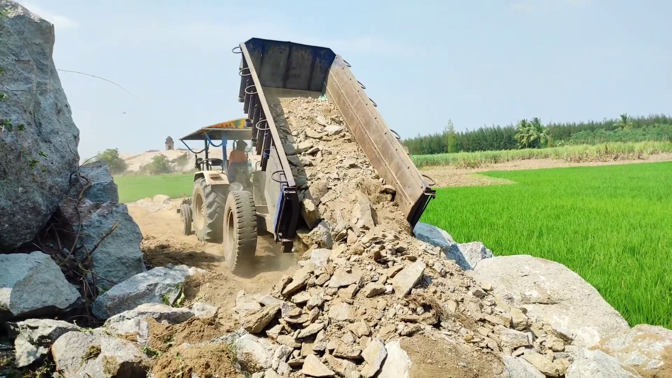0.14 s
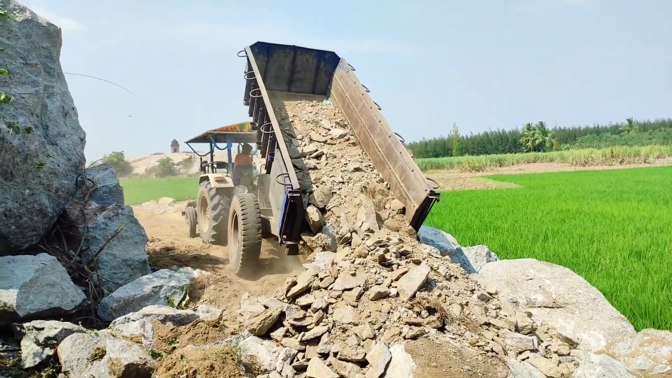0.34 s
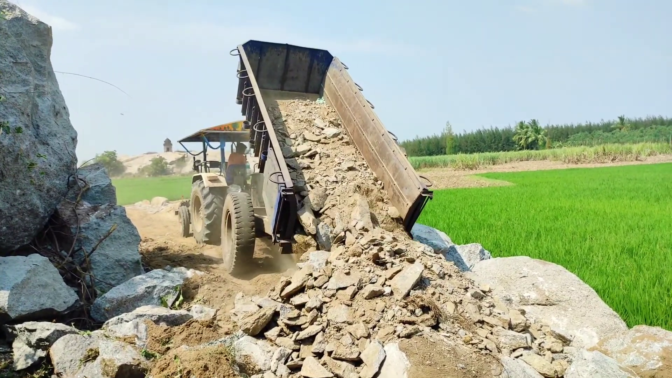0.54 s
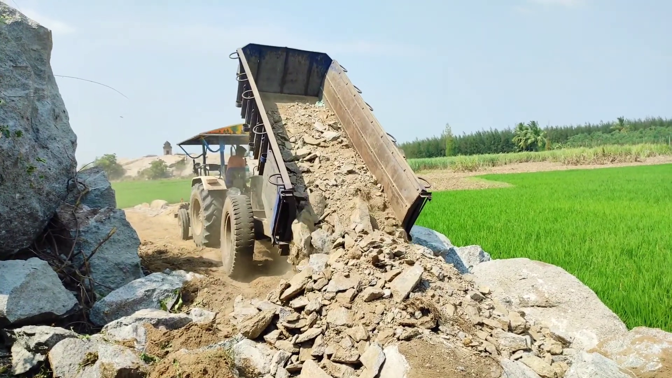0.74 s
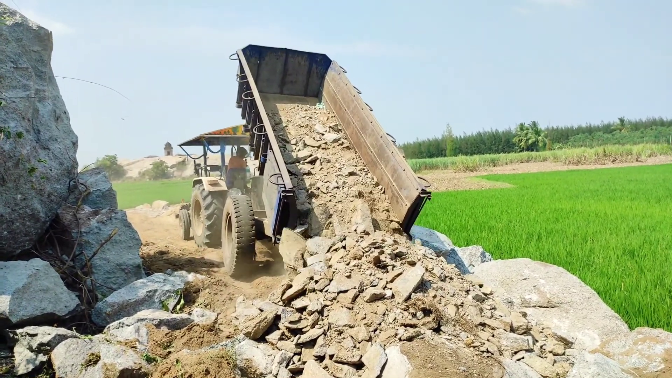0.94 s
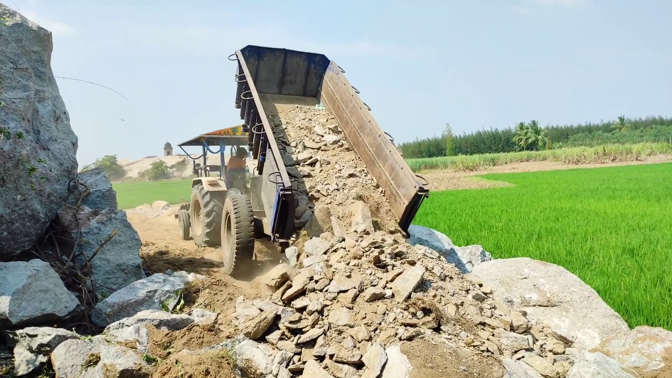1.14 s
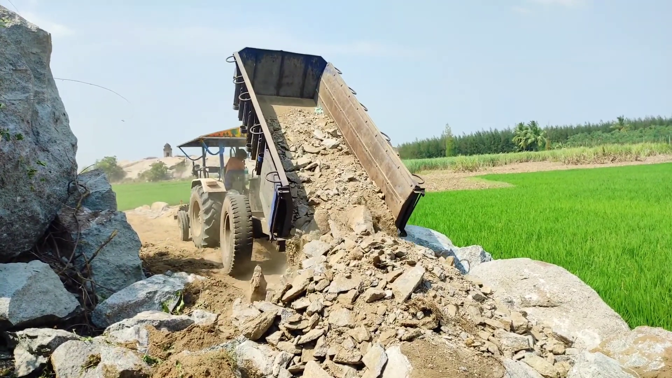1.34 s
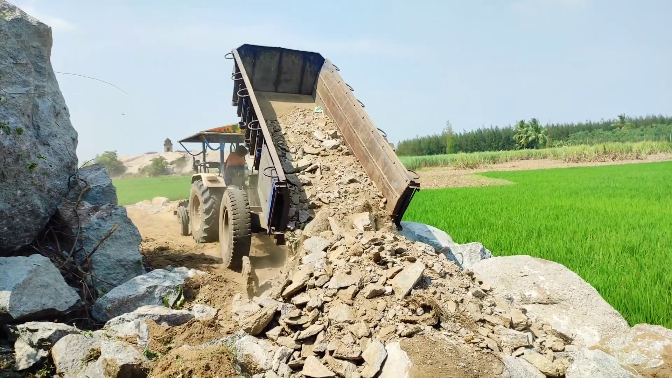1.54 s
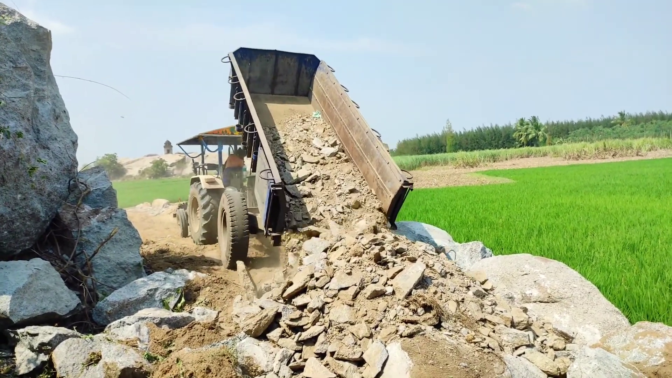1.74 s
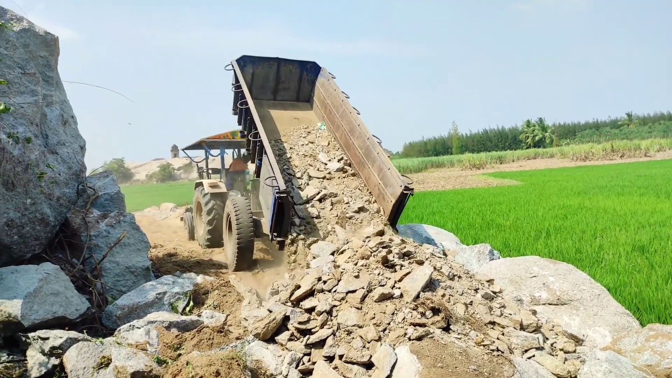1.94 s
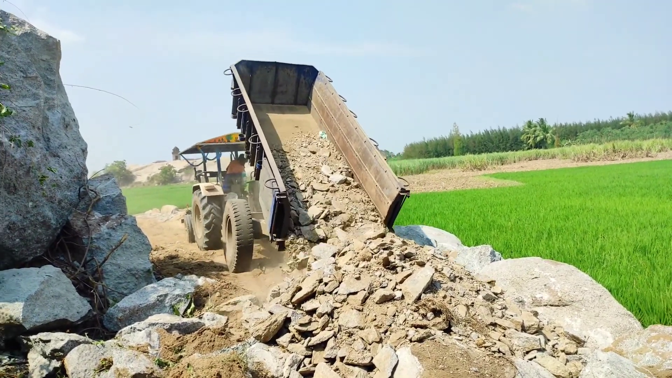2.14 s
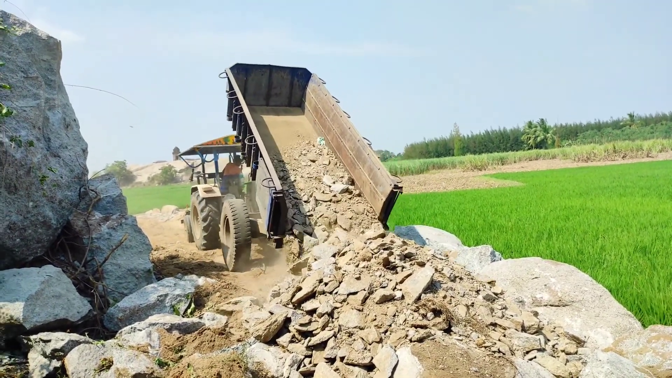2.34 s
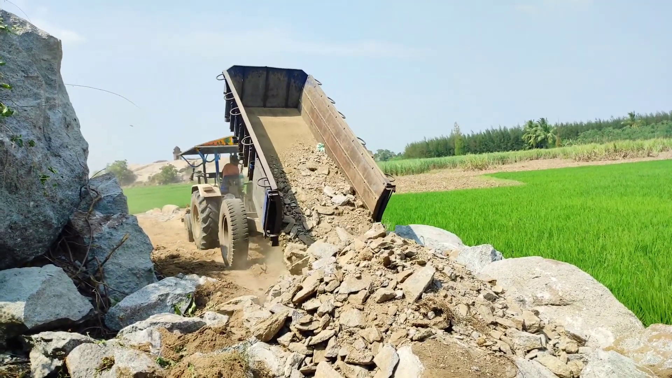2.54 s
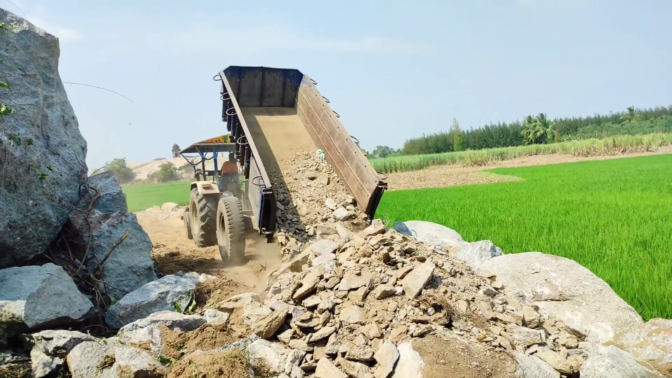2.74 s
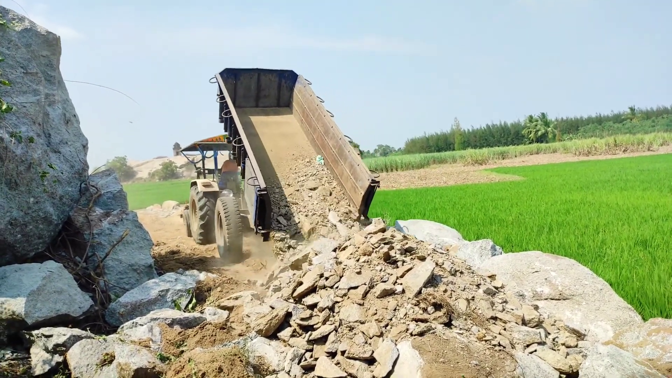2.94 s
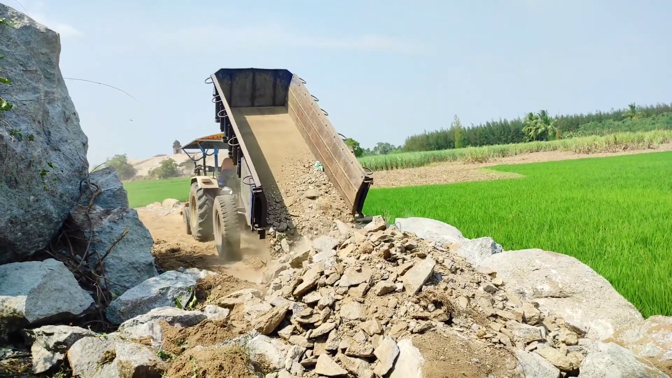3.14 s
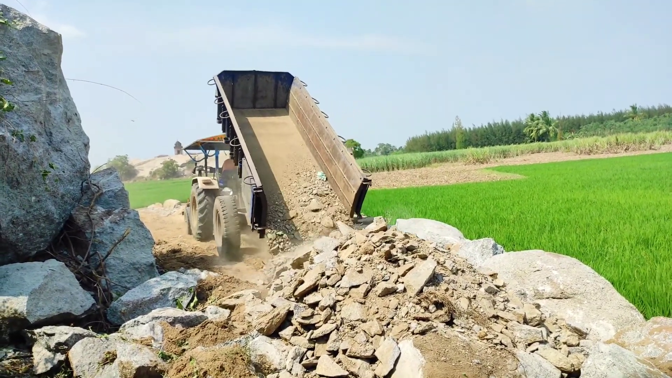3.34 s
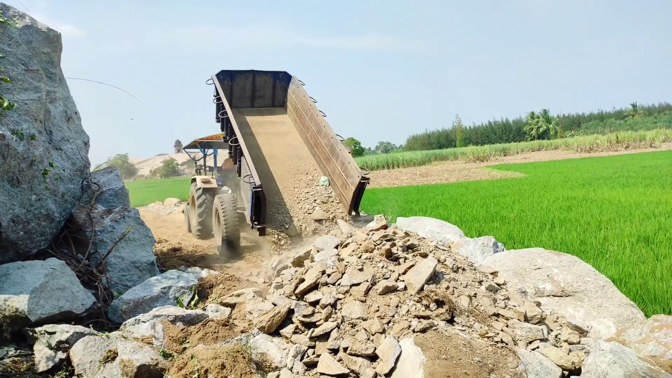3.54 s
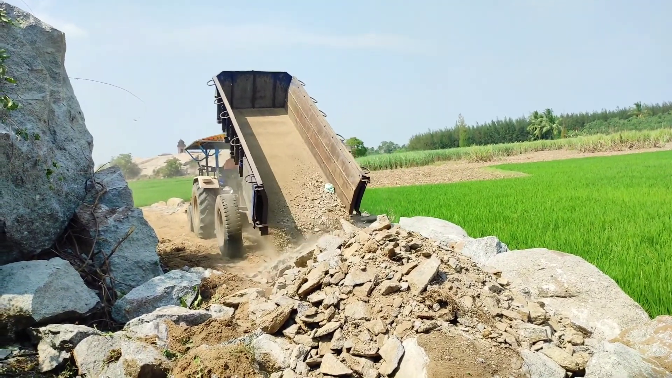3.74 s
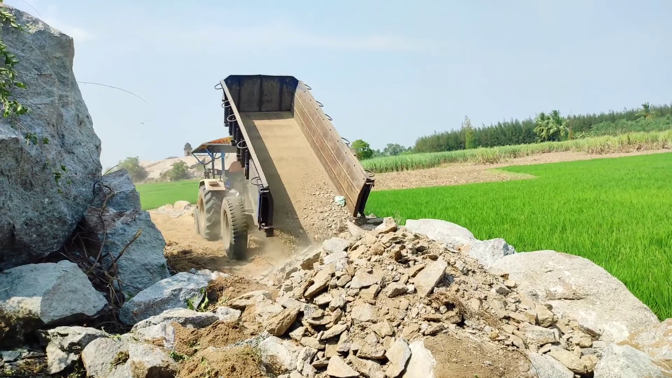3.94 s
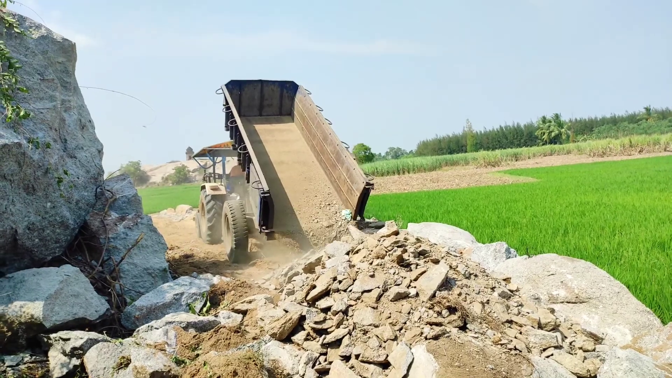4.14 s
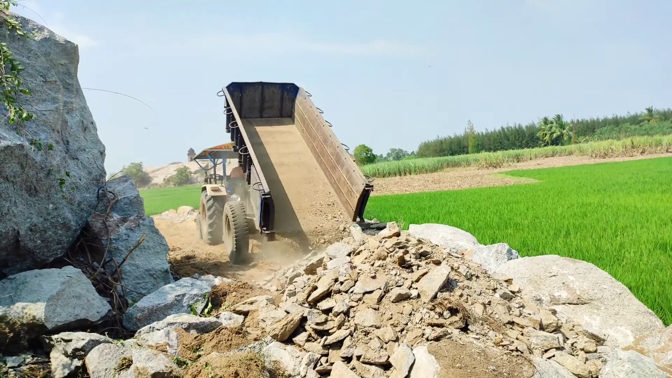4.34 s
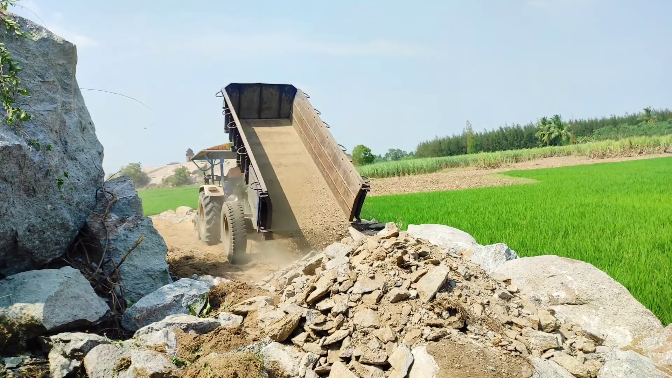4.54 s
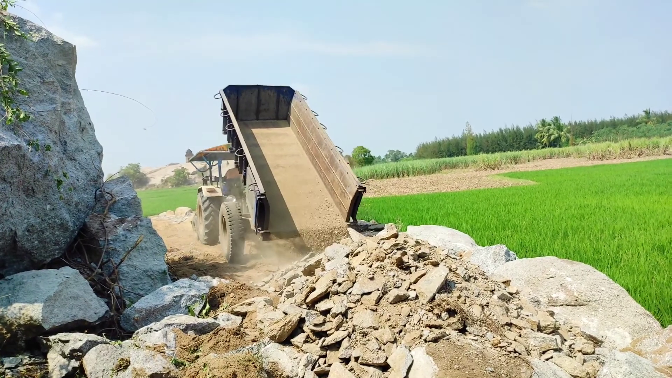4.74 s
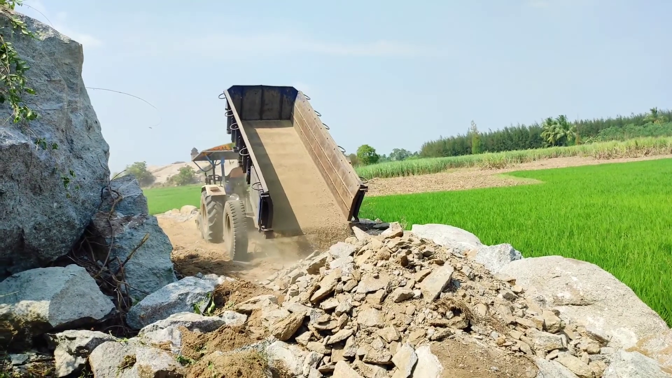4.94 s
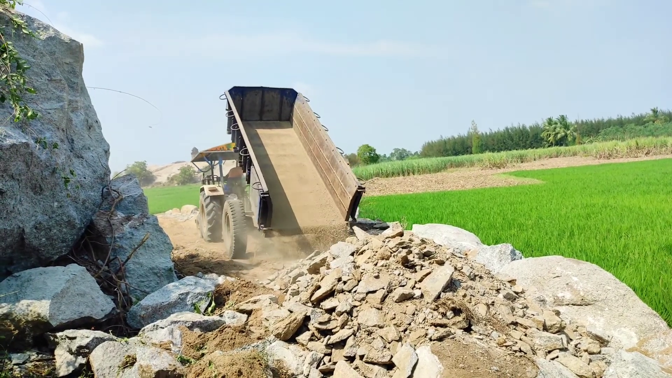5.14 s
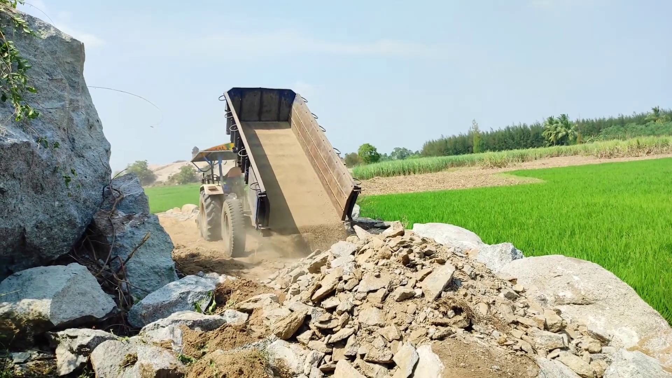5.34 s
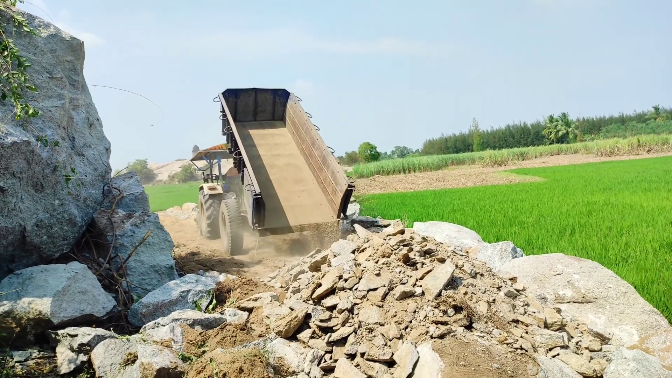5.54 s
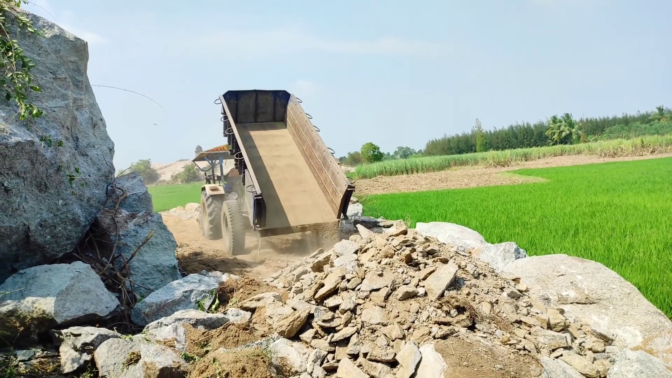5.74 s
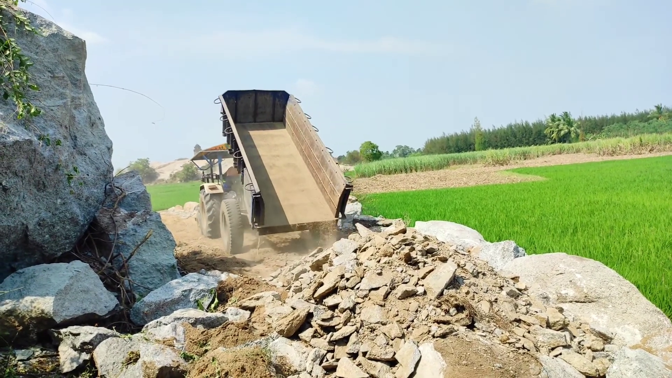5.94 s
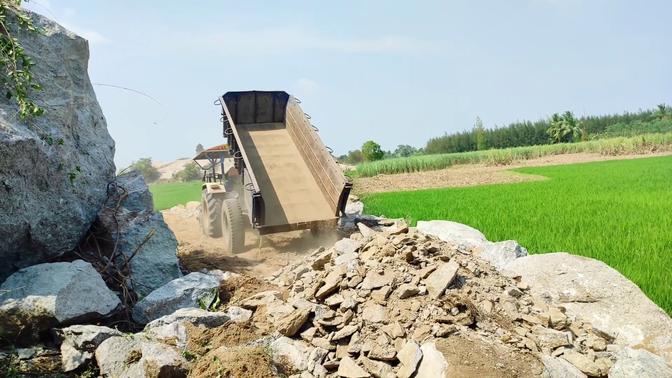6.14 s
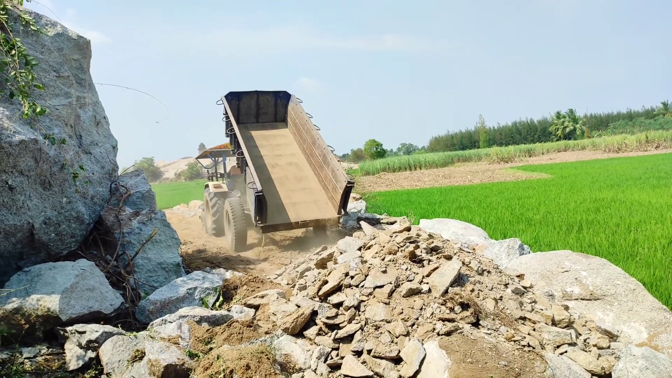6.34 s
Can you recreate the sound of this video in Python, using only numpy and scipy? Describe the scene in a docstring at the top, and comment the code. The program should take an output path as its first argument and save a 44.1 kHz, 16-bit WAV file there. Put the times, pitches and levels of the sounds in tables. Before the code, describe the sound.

Outdoors, about ten metres from a phone microphone, a load of soil and broken stone slides from a tipped steel trailer. Grit hisses, stones clatter and crack, slabs boom on the bed. The pour is thickest in the first three seconds, then thins quickly to trickles. A diesel tractor chugs underneath. Near the end the emptied bed bounces with a dull metallic clank and ring, followed by brief low puffs of wind.

```python
"""Soil hisses down a steel bed and stones clatter and make it boom: a tractor tips its trailer onto a rock heap.
The place is open ground some ten metres off; random contacts drive the colours of soil, stone and steel.
A diesel chugs underneath from harmonic puffs and gated noise. The flow dies away, the emptied bed jolts once on
ringing modes, and short bursts of low noise are puffs of wind touching the phone's two microphone ports."""
import sys
import numpy as np
from scipy import signal
from scipy.fft import rfft, irfft, next_fast_len
from scipy.io import wavfile
from scipy.ndimage import uniform_filter1d, map_coordinates

SR = 44100
rng = np.random.default_rng(int(sys.argv[2]) if len(sys.argv) > 2 else 0)


def unload_wav(signal):
    """Save mono or channel-first audio to the path in sys.argv[1] as 16-bit WAV at rate SR, clipped to [-1, 1]."""
    wavfile.write(
        sys.argv[1],
        SR,
        np.round(np.clip(np.atleast_2d(signal).T, -1, 1) * 32767).astype(np.int16),
    )


N = 281339
TIME = np.arange(N) / SR

# Levels in the tables are relative.
# The load pours, then runs out. Each row: time [s], flow over the tail [dB].
FLOW = [(0, -8), (.83, -3.5), (1.0, -.5), (2.0, 0.5), (3.1, -2.5), (3.8, -7.5), (4.4, -16.5), (5.1, -22),
        (5.35, -27), (6.3, -40.5)]
# Parts of the load give way or jam. Each row: time of the height [s], more soil [dB], more stone [dB],
# half length [s].
SLIPS = [(0.174, 2, 2.5, 0.043), (0.36, 5, 5, 0.076), (0.47, -1.5, -2.5, .02), (0.545, 4.5, 3.5, 0.094),
         (0.691, 6.5, 3, 0.068), (2.616, 0, 1.5, 0.08), (2.828, -2.5, -2, 0.018), (3.103, 1, 2.5, 0.051)]
# Colour of sliding soil. Each row: frequency [Hz], level [dB].
SOIL_COLOUR = [(50, -37), (200, -14.5), (1500, 0), (3500, -6), (6000, 1.5), (9000, 4), (15000, -4)]
# Colour of stone on stone. Each row: frequency [Hz], level [dB].
STONE_COLOUR = [(40, -8), (120, 12), (400, 16.5), (800, 15.5), (1300, 7.5), (2200, 10.5), (3200, 8),
                (5000, 12.5), (8000, 6), (15000, -1)]
# Modes of the loaded steel bed. Each row: frequency [Hz], width [Hz], level [dB].
BED_MODES = [(112, 22, -6), (238, 24, 6), (251.2, 4.9, 0.5), (297.4, 40, 8), (350, 16.5, 2), (504, 31, 1),
             (607, 163, -2), (725, 81, 1), (800, 30, -2), (1223, 56, -4)]
# Big slabs striking the bed. Each row: start [s], ring of the panel [dB], panel frequency [Hz],
# crack of the stone [dB], crumbling time [s].
SLABS = [(.192, -36, 240, -22, .015), (0.213, -18.5, 243, -32, .04), (.288, -15, 248, -22.5, .07),
         (0.349, -26, 250, -26.5, .045), (0.373, -20.5, 246, -22.5, 0.023), (.448, -25, 250, -30, .03),
         (0.53, -22, 300, -22, 0.038), (.588, -24.5, 320, -31, 0.02), (.768, -23, 250, -16, 0.036),
         (1.55, -28.5, 260, -24.5, 0.073), (1.616, -25, 288, -24.5, 0.04), (2.06, -23, 314, -21.5, 0.1),
         (2.372, -25.5, 335, -21, 0.12), (2.43, -20.5, 235, -24.5, 0.052), (2.661, -22.5, 300, -25.5, .025),
         (2.895, -21.5, 350, -23, 0.076), (3.251, -24, 298, -32, 0.042), (3.408, -31, 280, -23, 0.083),
         (3.56, -19.5, 300, -23.5, 0.035), (3.582, -30, 258, -28, 0.04), (3.712, -29, 280, -23.5, 0.057),
         (4.221, -26, 258, -52, 0.074)]
# Modes of a struck slab. Each row: frequency [Hz], width [Hz], level [dB].
SLAB_MODES = [(495, 11, -10), (665, 10, -4.5), (774, 18, 1.5), (835, 16, -9), (1000, 28, -1.5),
              (1195, 18, -7), (1383, 34, -2)]
# Colour of a hard crack. Each row: frequency [Hz], level [dB].
CRACK_COLOUR = [(70, -20.5), (170, -9), (350, 2.5), (550, 4.5), (750, 7.5), (1000, -9.5), (1350, 9.5),
                (1800, -33), (2900, -7), (4000, -15), (15000, -32)]
# Dull thuds of heavy lumps, and of the bed dropping back. Each row: start [s], level [dB], pitch [Hz].
THUDS = [(1.532, -25, 124), (1.901, -28, 90), (2.368, -24.5, 98), (2.427, -25, 103), (3.406, -27.5, 95),
         (3.928, -22.5, 115.5), (4.02, -26, 120), (4.092, -28, 102.5), (4.2, -27, 130), (4.24, -28, 186),
         (4.295, -28.5, 288), (4.666, -31, 115), (5.15, -26, 109), (5.21, -21, 102.6)]
# Single stones clacking and skipping off the heap. Each row: start [s], level [dB], decay time [s], pitch [Hz].
PEBBLES = [(0.126, -26, 0.016, 3130), (0.211, -21, 0.011, 1920), (0.265, -23, 0.0089, 5400),
           (.349, -22, .02, 1110), (0.751, -24, 0.011, 1280), (0.764, -15, 0.022, 1337),
           (1.055, -22.5, .01, 1910), (1.129, -16.5, 0.0086, 6040), (1.294, -21, 0.014, 2210),
           (1.561, -18, .024, 2655), (1.65, -24, .01, 2410), (1.81, -31, .014, 2420),
           (1.92, -18.5, 0.03, 1334), (3.017, -20, 0.016, 2730), (3.081, -17.5, 0.015, 2870),
           (3.325, -23.5, .01, 7450), (3.386, -26, .008, 5900), (3.453, -23, 0.016, 7630),
           (3.558, -21.5, 0.0089, 4750), (3.71, -18.5, 0.037, 1278), (3.765, -40, .011, 7500),
           (3.91, -26.5, 0.014, 7500), (4.659, -36, .0096, 7670), (5.054, -32.5, .006, 7600),
           (5.138, -33, .0088, 6300), (6.297, -36, 0.024, 2080)]
# Bounces of the emptied bed. Each row: start [s], clank of the fittings [dB], boom of the frame [dB],
# ring of the panels [dB].
BOUNCES = [(5.14, -30, -27, -32.5), (5.16, -37, -30, -36), (5.176, -37, -34, -32), (5.196, -35, -46, -38),
           (5.211, -34, -27, -36), (5.234, -39, -37, -27), (5.315, -51, -36, -38), (5.355, -42, -44, -43)]
# Modes of the fittings. Each row: frequency [Hz], width [Hz], level [dB].
FITTING_MODES = [(1310, 20.5, 1), (2240, 30, -3), (2620, 16, 1), (2720, 23, -1), (3000, 24, 1),
                 (3820, 16, 0), (4120, 30, -7), (4900, 20, -3), (5020, 30, -2)]
# Modes of the jolted frame. Each row: frequency [Hz], width [Hz], level [dB].
FRAME_MODES = [(96, 8.1, 1), (111, 9.7, 0), (193, 14, -10)]
# Modes of the bare panels. Each row: frequency [Hz], width [Hz], level [dB].
EMPTY_BED_MODES = [(217.6, 10, -0.5), (249, 14, 1), (288, 9.2, 0.5), (313, 11, -2), (344, 10, -4),
                   (415, 8.2, -6.5), (514, 7.5, -3.5), (591, 11, -9), (677, 7.9, -15), (783, 9, -19),
                   (840, 7, -17), (940, 12, -22)]
# Pace of the engine. Each row: time [s], chugs per second [1/s].
CHUG_RATE = [(0.0, 17.54), (0.6, 16.41), (1.2, 14.32), (1.5, 17.85), (1.8, 15.6), (2.1, 17.59), (2.8, 17.2),
             (3.3, 15.35), (3.8, 15.46), (4.1, 13.93), (4.7, 15.83), (5.3, 17.34), (5.6, 16.95),
             (6.3, 17.64)]
# Strength of the exhaust puffs. Each row: time [s], level [dB].
EXHAUST_LEVEL = [(0, -28.5), (.45, -32), (.7, -30.5), (.84, -38), (1.4, -36.5), (1.9, -41), (2.3, -44.5),
                 (2.9, -43), (3.45, -38), (4.15, -37), (5.3, -40), (6.3, -48)]
# One exhaust puff: level [dB] of multiples 1, 2, 3 .. of the chug rate.
PUFF_HARMONICS = [-24, 4.5, 7, 3.5, -13.5, -13.5, -10]
# Diesel knock after each firing. Each row: frequency [Hz], level [dB].
KNOCK_COLOUR = [(60, -44), (120, -26), (260, -17), (420, -29), (600, -27.5), (880, -22.5), (1060, -29),
                (1190, -17), (1320, -17), (1500, -34), (2500, -32.5), (4000, -54), (15000, -56)]
# Bark of the exhaust, later in each cycle. Each row: frequency [Hz], level [dB].
BARK_COLOUR = [(200, -40.5), (450, -40), (620, -23), (730, -29), (860, -25), (960, -23.5), (1060, -38),
               (2000, -52)]
# Whirr of gears and fan. Each row: frequency [Hz], level [dB].
WHIRR_COLOUR = [(20, -33), (60, -23.5), (95, -16.5), (150, -27), (235, -24), (330, -29), (440, -51),
                (650, -38.5), (950, -39.5), (1600, -42), (2500, -38), (4000, -43), (15000, -48)]
# Faint wavering tones of the gears and pump. Each row: frequency [Hz], level [dB].
GEAR_TONES = [(614, -59.5), (856, -63), (975, -57.5), (1174, -55.5), (1272, -60)]
# Puffs of wind on the right port. Each row: start [s], level [dB], length [s].
GUSTS = [(5.867, -22, 0.087), (5.99, -20.5, 0.084), (6.207, -21, 0.023), (6.252, -19.5, 0.028)]
# Colour of the wind. Each row: frequency [Hz], level [dB].
GUST_COLOUR = [(20, 0), (45, 6.5), (80, -9.5), (160, -1), (260, -10), (420, -28), (1000, -44), (5000, -60)]
# Microphone ports, each with its own cavity resonance. Each row: frequency [Hz], left [dB], right [dB].
PORTS = [(49.6, -2, -5), (263, 3.5, -1.5), (472, 3, -1), (560, -2.5, 2), (800, 2, -3), (1340, -5.5, -5.5),
         (2780, -2.5, -3.5), (3920, -5.5, -5.5), (5820, -2, -2.5), (7370, 6, 11), (8500, 8.5, 2),
         (9020, 7, -3.5), (9960, -11, -13), (15600, -22.5, -21)]
# Share of the sound that reaches the two ports unalike. Each row: frequency [Hz], level [dB].
SCATTER = [(50, -17), (250, -15), (450, -6.5), (750, -9), (1200, 2.5), (2200, -5.5), (4000, -2.5),
           (15000, 1)]

# Each layer's relative level at full flow [dB], and the dB it loses for each dB of flow.
SOIL_DB, SOIL_SLOPE = -18, 1.0
STONE_DB, STONE_SLOPE = -26, 1.126
DRUM_DB, DRUM_SLOPE = -23, 0.57
# The drumming is up at LOOSE_S and holds until the last heavy stone leaves the bed at EMPTY_S.
LOOSE_S, EMPTY_S, DRUM_FADE_S, DRUM_REST_DB = 0.2, 4.16, 0.106, -9.5
LIGHTEN = .1  # share by which the drumming bed's modes rise as the weight comes off it
JOLT_S, JOLT_HOLD_S = 5.141, 0.096
END_S, TOP_HZ = 6.328, 15500
DIRECT_ONLY = np.array([[1], [0]])


def pour():
    """One flow drives hissing soil, clattering gravel and cobbles, scraping stones and the drumming of the bed."""
    soil_flow_db, stone_flow_db = flows()
    rest = undb(DRUM_REST_DB)
    heavy = rest + (1 - rest) * envelope(0, LOOSE_S, EMPTY_S - LOOSE_S, DRUM_FADE_S)
    soil_db = shaken(SOIL_DB + SOIL_SLOPE * soil_flow_db, jolt_db=-44, release_s=0.014)
    stone_db = shaken(STONE_DB + STONE_SLOPE * stone_flow_db, jolt_db=-41.5, release_s=0.034)
    drum_db = DRUM_DB + DRUM_SLOPE * stone_flow_db + 20 * np.log10(heavy)
    drum_db = shaken(drum_db, jolt_db=-38, release_s=0.21)
    surge = walk(22.27)  # the load moves in small slips
    gravel = stones(stone_db - 2, surge, hits_per_s=700, lowest_hz=1098.6, crack_s=0.0018, ring_share=0.53)
    cobbles = stones(stone_db - 9, surge, hits_per_s=160, lowest_hz=620.6, crack_s=0.0036, ring_share=0.64)
    stone_layers = gravel + cobbles + scrapes(stone_flow_db) + skipping(stone_flow_db)
    return soil(soil_db, surge) + stone_layers + rumble(drum_db)


def flows():
    """How much soil and how much stone is moving, in dB: the long pour plus its slips."""
    soil_db = stone_db = curves(FLOW)[0]
    for s, more_soil_db, more_stone_db, half_length_s in SLIPS:
        swell = np.exp(-((TIME - s) / half_length_s) ** 2)
        soil_db = soil_db + more_soil_db * swell
        stone_db = stone_db + more_stone_db * swell
    return soil_db, stone_db


def shaken(level_db, jolt_db, release_s):
    """Raise a layer's level by what the jolt shakes loose."""
    loose = undb(jolt_db) * envelope(JOLT_S, 0.0036, JOLT_HOLD_S, release_s)
    return 20 * np.log10(undb(level_db) + loose)


def soil(level_db, surge, grains_per_s=22000, surge_db=.5, flicker_db=0.7):
    """Grit slides over steel: thousands of tiny ticks that merge into a hiss and come in small spills."""
    grit = steady(impacts(grains_per_s, spread_db=1.2), .1)
    spills_db = surge_db * surge + flicker_db * walk(70)
    return colour(grit * undb(level_db + spills_db), SOIL_COLOUR)


def stones(level_db, surge, hits_per_s, lowest_hz, crack_s, ring_share, ring_s=.0055, spread_db=2):
    """Pieces of all sizes collide; each gives a crack and three short tones, and a thin flow has fewer of them."""
    out, t = np.zeros((2, N)), np.arange(SR // 30) / SR
    shapes, count = 256, 12000
    size, second, third = rng.random((3, shapes, 1, 1))
    pieces = rng.standard_normal((shapes, 2, len(t))) * np.exp(-t / crack_s)
    for ratio in (1, 1.4 + second, 2.3 + third):
        phase = rng.uniform(0, 2 * np.pi, (shapes, 2, 1))
        tone = np.sin(2 * np.pi * lowest_hz * 7 ** size * ratio * t + phase)
        # the higher a piece rings, the shorter
        pieces = pieces + ring_share * tone * np.exp(-t / ring_s * (.5 + size))
    chance = rng.random((count, 4))
    # the chance that a candidate hit sounds follows the flow
    busy = hits_per_s * undb(.15 * (level_db - level_db.max())) * TIME[-1] / count
    sounding = chance[:, 0] < busy[(chance[:, 1] * N).astype(int)]
    for _, when, force, piece in chance[sounding]:
        strength = undb(-spread_db * np.log(force + .04))
        add(out, when * TIME[-1], strength * pieces[int(piece * shapes)])
    return colour(steady(out, 0.11) * undb(level_db + .5 * surge), STONE_COLOUR)


def scrapes(flow_db, level_db=-28, slope=3.2, length_s=.016, slips_per_s=330, lowest_hz=850, span=3.62):
    """In the thick of the pour flat stones grind: short runs of stick and slip, each at its own stone's pitch."""
    out, t = np.zeros((2, N)), np.arange(SR // 10) / SR
    for when, size, speed, force in rng.random((300, 4)):
        slips = np.cumsum(slips_per_s * (.5 + speed) * np.exp(-t / length_s / 10)) / SR
        catches = np.exp(-(slips % 1) / 0.16)
        swell = t / length_s * np.exp(-t / length_s)
        grind = rng.standard_normal((2, len(t))) * catches * swell
        body = signal.iirpeak(lowest_hz * span ** size, 7, fs=SR)
        add(out, when * TIME[-1], (0.2 + force) * signal.lfilter(*body, grind))
    return out / out[0].std() * undb(level_db + slope * flow_db)


def skipping(flow_db, level_db=-23, slope=0.91, lowest_hz=1150, span=5.0, rebound_db=-4):
    """Hard pieces skip down the heap, each in three quickening and weakening clacks."""
    out = np.zeros((2, N))
    count, hop_s, length_s = 75, .045, .005
    for when, size, height, force in rng.random((count, 4)):
        s = when * EMPTY_S
        for k in range(3):
            strength = undb(level_db + k * rebound_db - 6 * force)
            add(out, s, strength * clack(lowest_hz * span ** size, length_s))
            s += hop_s * (.5 + height) / (k + 1)
    return out * undb(slope * flow_db)


def rumble(level_db, knocks_per_s=2200):
    """Tumbling stone drums on the bed, whose pitch creeps up as it empties."""
    drumming = steady(ring(impacts(knocks_per_s, spread_db=1.8)), .08)
    drumming = colour(drumming, [(40, -11), (95, 0)])  # the bed radiates little deep bass
    # reading the drumming ever faster raises its pitch
    place = np.cumsum(1 + LIGHTEN * (np.minimum(TIME / EMPTY_S, 1) - .5))
    drumming = np.array([map_coordinates(x, [place], order=1, mode="mirror") for x in drumming])
    return drumming * undb(level_db)


def judder(level_db=-27, rasp_db=-26):
    """As the load breaks loose, stick and slip drive the main panel mode and rasp over the floor."""
    rasp = steady(ring(impacts(900, spread_db=1.5)), .08)
    tone = groan(hz=247.0, waver=0.038, flutter_db=2.5)
    scrape = undb(level_db) * tone + undb(rasp_db) * rasp
    return scrape * envelope(start_s=0.11, attack_s=0.16, hold_s=0.13, release_s=0.07)


def slabs(sharpness=3.1, stone_share=0.97):
    """Big slabs land one by one: the stone cracks, rings and crumbles, and the panel under it booms on."""
    out, t = np.zeros((2, N)), np.arange(SR // 3) / SR
    for s, ring_db, panel_hz, crack_db, crumble_s in SLABS:
        bed = struck(BED_MODES, t, scatter_db=0)
        panel = filtered(bed, lambda f: 1 / (1 + 1j * sharpness * (f / panel_hz - panel_hz / f)))
        stone = struck(SLAB_MODES, t * rng.uniform(.93, 1.07), scatter_db=3)  # each slab has its own pitch
        blow = burst(crack(t, crumble_s) + stone_share * stone)
        add(out, s, undb(ring_db) * burst(panel) + undb(crack_db) * blow)
    return out


def thuds(decay_s=0.064, rise_s=0.0021, crush_share=0.56, gain_db=1):
    """Soft, heavy contacts: a few low swings and a muffled crunch that die quickly."""
    out, t = np.zeros((2, N)), np.arange(SR // 3) / SR
    shape = (1 - np.exp(-t / rise_s)) * np.exp(-t / decay_s)
    for s, db, hz in THUDS:
        swing = burst(np.sin(2 * np.pi * hz * t) * shape * DIRECT_ONLY)
        noise = rng.standard_normal((2, len(t))) * shape
        crunch = burst(filtered(noise, lambda f: (1 + 1j * (f / hz / 1.5 - 1.5 * hz / f)) ** -2))
        add(out, s, undb(gain_db + db) * (swing + crush_share * crunch) / 2)
    return out


def jolt(crack_db=-13, shudder_db=-28, sway_db=-25.0):
    """The empty bed bounces on its hinges and shudders: fittings clank, frame booms, bare panels ring on."""
    out, t = np.zeros((2, N)), np.arange(SR // 2) / SR
    for s, clank_db, boom_db, ring_db in BOUNCES:
        boom = sum(undb(db) * np.sin(2 * np.pi * hz * t) * np.exp(-np.pi * width * t)
                   for hz, width, db in FRAME_MODES)
        panels = struck(EMPTY_BED_MODES, t, scatter_db=0) + undb(crack_db) * crack(t, crumble_s=0.039)
        add(out, s, undb(boom_db) * burst(boom * DIRECT_ONLY))
        add(out, s, undb(clank_db) * struck(FITTING_MODES, t, scatter_db=0.5))
        add(out, s, undb(ring_db) * panels)
    shudder = steady(ring(rng.standard_normal((2, N)), EMPTY_BED_MODES), .03)
    shudder = undb(shudder_db) * shudder * envelope(JOLT_S, attack_s=.03, hold_s=0.1, release_s=.14)
    sway = undb(sway_db) * groan(hz=103, waver=0.039, flutter_db=1)
    sway = sway * envelope(JOLT_S - .035, attack_s=.06, hold_s=.075, release_s=.045)
    return out + shudder + sway


def pebbles():
    """Single stones stand out, each with a clack at its own pitch."""
    out = np.zeros((2, N))
    for s, db, length_s, hz in PEBBLES:
        add(out, s, undb(db) * clack(hz, length_s))
    return out


def tractor(knock_db=0, bark_db=-1, knock_delay=0.05, bark_delay=0.46, decay=0.29, uneven_db=.8):
    """Each firing knocks in the block, then barks and puffs from the exhaust; gears whirr and sing faintly."""
    turns = np.cumsum(curves(CHUG_RATE)[0]) / SR + 0.055  # counted in chugs, as are delays and decay
    puffs = -sum(undb(db) * np.cos(2 * np.pi * (k + 1) * turns) for k, db in enumerate(PUFF_HARMONICS))
    puffs = puffs / puffs.std() * undb(curves(EXHAUST_LEVEL)[0] + uneven_db * walk(11))
    firings = 0
    for spectrum, db, delay in ((KNOCK_COLOUR, knock_db, knock_delay), (BARK_COLOUR, bark_db, bark_delay)):
        phase = (turns - delay + .07 * walk(13)) % 1  # firings come a little early or late
        gate = (1 - np.exp(-phase / .05)) * np.exp(-phase / decay)
        strength = undb(db + 2 * walk(17))
        firings = firings + colour(rng.standard_normal((2, N)) * gate * strength, spectrum)
    whirr = colour(rng.standard_normal((2, N)) * undb(1.1 * walk(60)), WHIRR_COLOUR)
    tones = sum(undb(db) * groan(hz, waver=0.00605, flutter_db=4) for hz, db in GEAR_TONES)
    return firings + whirr + tones + puffs * DIRECT_ONLY


def wind(left_db=-13):
    """Short eddies buffet the ports as bursts of low noise, mostly the right one."""
    out, t = np.zeros((2, N)), np.arange(SR // 4) / SR
    for s, db, length_s in GUSTS:
        shape = (1 - np.exp(-t / 0.0061)) * np.exp(-(t / length_s) ** 2)
        eddy = rng.standard_normal((2, len(t))) * shape
        add(out, s, undb(db) * burst(colour(eddy, GUST_COLOUR)))
    return np.array([undb(left_db) * out[1], out[0]])


def impacts(rate, spread_db):
    """Sparse random contacts, mostly small and a few large, as direct and scattered sound."""
    hit = rng.random(N) < rate / SR
    size = undb(spread_db * np.minimum(rng.exponential(size=N), 4))
    return hit * size * rng.standard_normal((2, N))


def clack(hz, length_s):
    """One stone on another: a gritty tick and three brief tones of the piece."""
    t = np.arange(SR // 10) / SR
    grit = rng.standard_normal((2, len(t))) * np.exp(-t / length_s)
    scuff = filtered(grit, lambda f: 1 / (1 + 2j * (f / hz - hz / f)))
    ratios = np.array([1, rng.uniform(1.15, 1.45), rng.uniform(1.5, 2.1)])[:, None, None]
    tones = np.sin(2 * np.pi * (hz * ratios * t + rng.random((3, 2, 1))))
    tones = tones * np.exp(-t * ratios / length_s) / ratios  # higher tones are weaker and shorter
    return burst(burst(scuff) + burst(tones.sum(axis=0)))


def crack(t, crumble_s):
    """A hard contact that crumbles away as decaying noise."""
    shape = (1 - np.exp(-t / .0015)) * np.exp(-t / crumble_s)
    return burst(colour(rng.standard_normal((2, len(t))) * shape, CRACK_COLOUR))


def struck(modes, t, scatter_db):
    """Free ring of decaying modes; each blow has new phases, and scatter_db weights the modes anew."""
    hz, width, db = np.transpose(modes)[:, :, None, None]
    weight = undb(db + scatter_db * rng.standard_normal((len(modes), 2, 1)))
    phase = rng.uniform(0, 2 * np.pi, weight.shape)
    swings = weight * np.sin(2 * np.pi * hz * t + phase) * np.exp(-np.pi * width * t)
    return burst(swings.sum(axis=0) * (1 - np.exp(-t / .002)))


def ring(x, modes=BED_MODES):
    """Steel modes resonate under a force x; a narrow width rings longer."""
    return filtered(x, lambda f: sum(undb(db) / (1 + 1j * hz / width * (f / hz - hz / f))
                                     for hz, width, db in modes))


def groan(hz, waver, flutter_db):
    """One tone kept swinging, with wavering pitch and strength."""
    turns = np.cumsum(hz * (1 + waver * walk(35))) / SR
    return np.sqrt(2) * np.sin(2 * np.pi * turns) * undb(flutter_db * walk(50)) * DIRECT_ONLY


def envelope(start_s, attack_s, hold_s, release_s):
    """Gain that rises in a straight line, holds and dies away."""
    age = TIME - start_s
    return np.clip(age / attack_s, 0, 1) * np.exp(-np.maximum(age - attack_s - hold_s, 0) / release_s)


def walk(rate):
    """Smooth chance with a spread near 1, drawn anew rate times a second."""
    size = int(SR / rate)
    steps = np.repeat(rng.standard_normal(N // size + 1), size)
    return 1.2 * uniform_filter1d(steps, size)[:N]


def steady(x, span_s):
    """Bring the running level to 1 and keep the faster detail."""
    power = uniform_filter1d(np.mean(x ** 2, axis=0), int(span_s * SR))
    return x / np.sqrt(np.abs(power) + 1e-12)


def burst(x):
    """Bring the direct sound's loudest hundredth of a second to level 1."""
    return x / np.sqrt(uniform_filter1d(x[0] ** 2, SR // 100).max())


def add(out, s, sound):
    """Mix a sound in at time s."""
    start = int(s * SR)
    out[:, start:start + sound.shape[1]] += sound[:, :N - start]


def colour(x, points):
    """Shape x with a spectrum of (Hz, dB) points."""
    hz, db = np.transpose(points)
    return filtered(x, lambda f: undb(np.interp(np.log(f), np.log(hz), db)))


def filtered(x, response):
    """Pass x through a response given as a function of frequency."""
    size = next_fast_len(x.shape[-1] + SR // 4, True)
    hz = np.maximum(np.fft.rfftfreq(size, 1 / SR), 1)
    return irfft(rfft(x, size) * response(hz), size)[..., :x.shape[-1]]


def curves(table):
    """The columns of a table of (s, ..) rows at every sample."""
    s, *columns = np.transpose(table)
    return [np.interp(TIME, s, c) for c in columns]


def undb(db):
    """Decibels to gain."""
    return 10 ** (np.asarray(db) / 20)


def scene():
    """All sources as direct and scattered sound; the rocks scatter the treble so each port hears its own mix."""
    direct, scattered = pour() + judder() + slabs() + thuds() + jolt() + pebbles() + tractor()
    side = colour(scattered, SCATTER)
    return np.array([direct + side, direct - side]) + wind()


def record(dry, lag_s=.00007, gain_db=-1.5):
    """The ports colour the sound, the left one hears it a little later, peaks are rounded and the top is cut."""
    left, right = (colour(dry[k], np.array(PORTS)[:, [0, k + 1]]) for k in range(2))
    left = filtered(left, lambda f: np.exp(-2j * np.pi * f * lag_s))
    sound = np.array([left, right]) * undb(gain_db)
    rounded = sound / (1 + (sound / .9) ** 8) ** (1 / 8)
    faded = rounded * np.clip((END_S - TIME) / .012, 0, 1)
    top_cut = signal.ellip(8, .2, 70, TOP_HZ, fs=SR, output="sos")
    return signal.sosfilt(top_cut, faded)


dry = scene()
out = record(dry)
unload_wav(out)
```